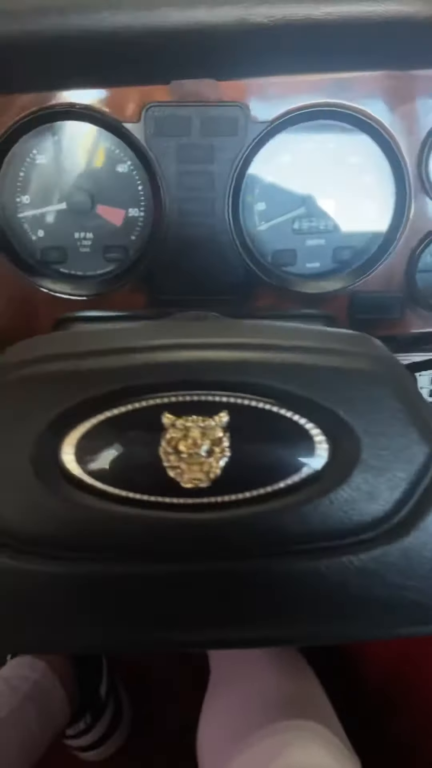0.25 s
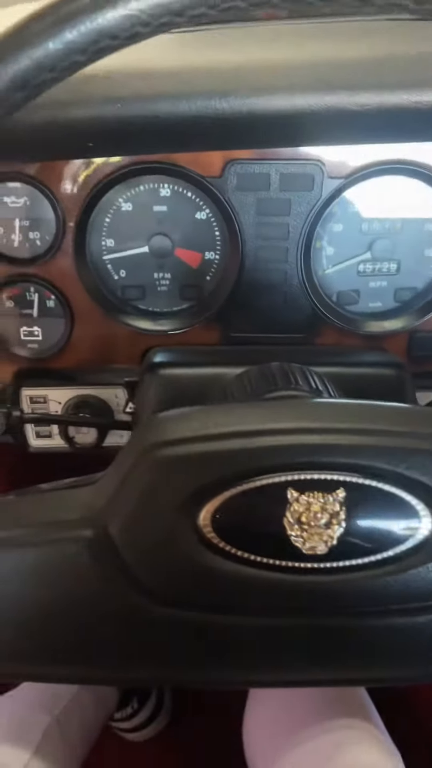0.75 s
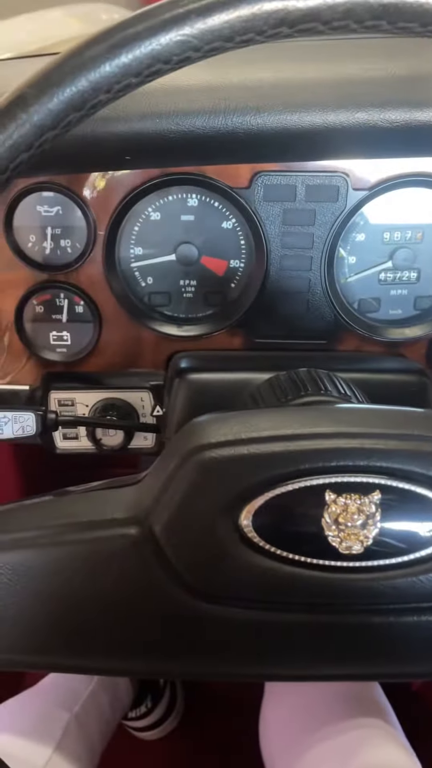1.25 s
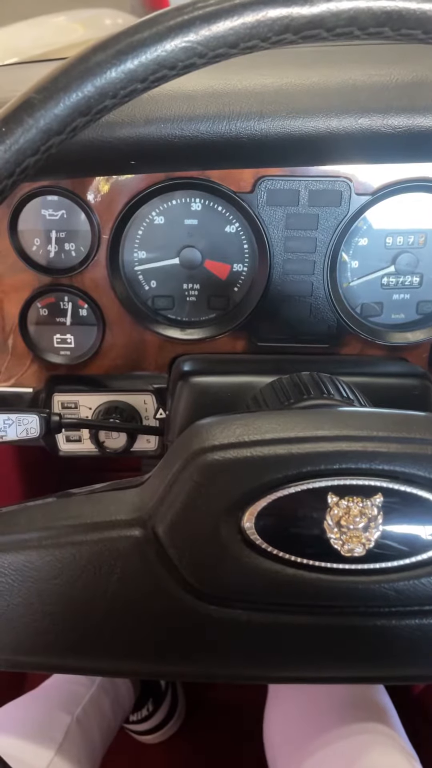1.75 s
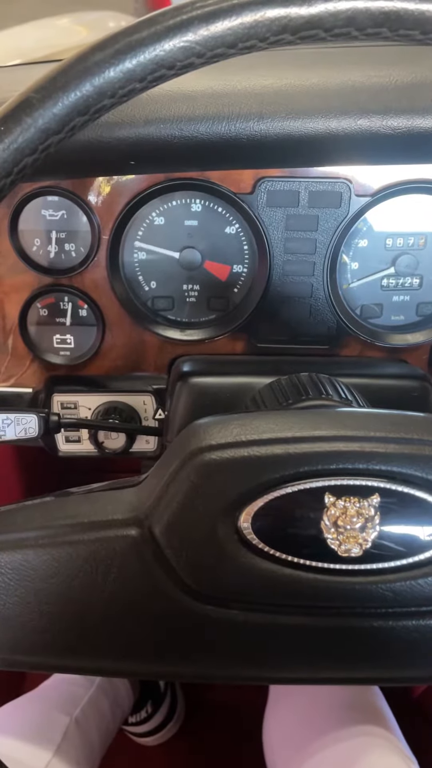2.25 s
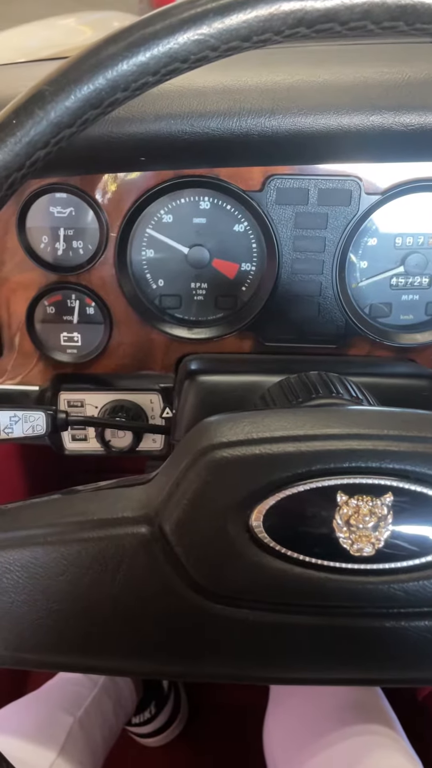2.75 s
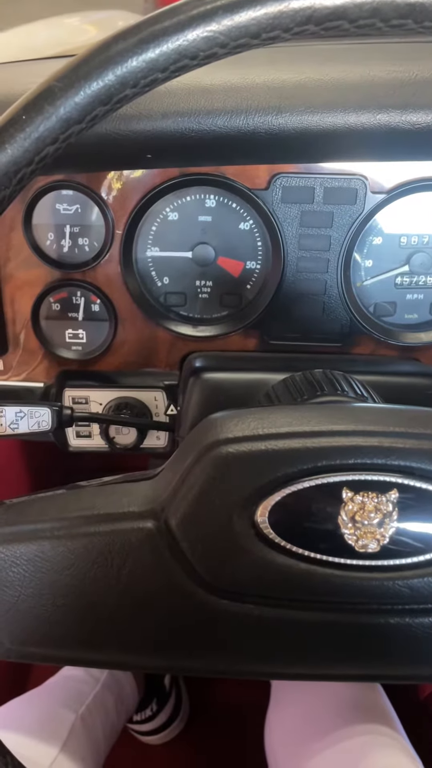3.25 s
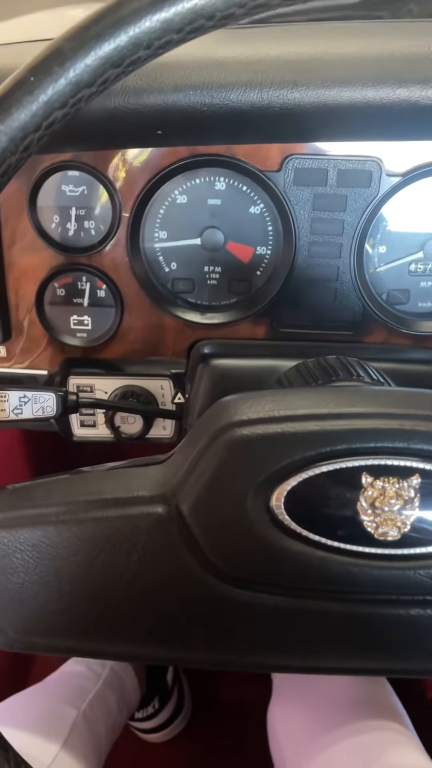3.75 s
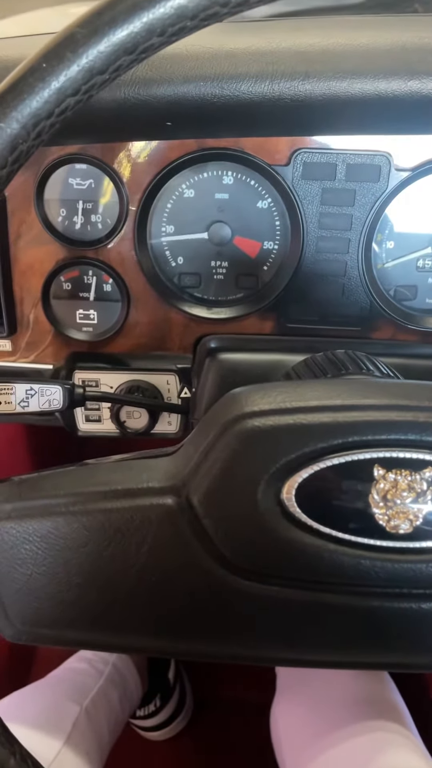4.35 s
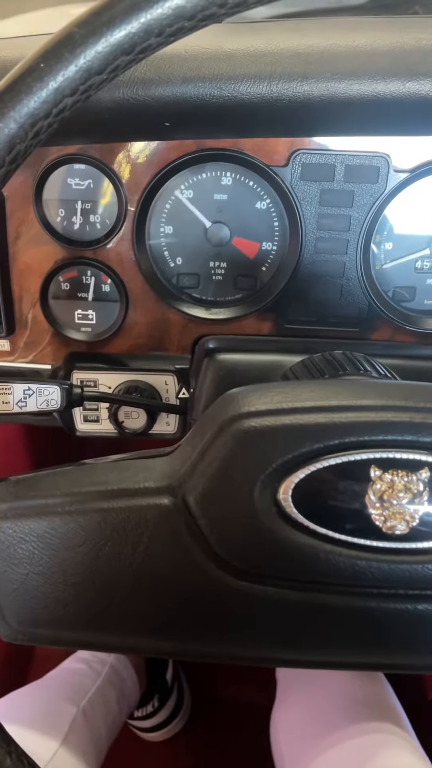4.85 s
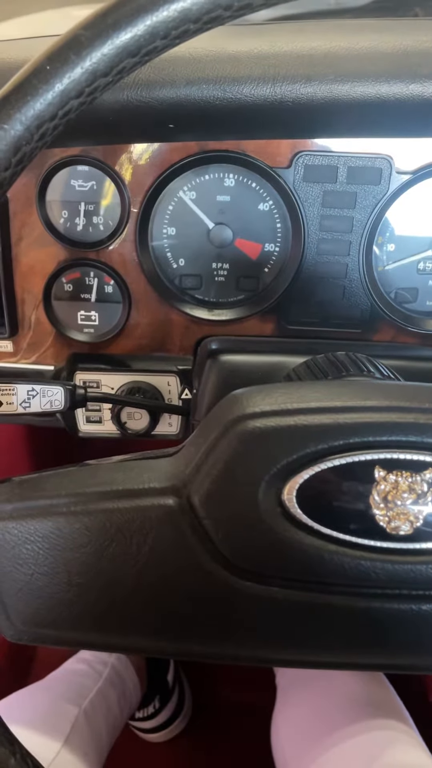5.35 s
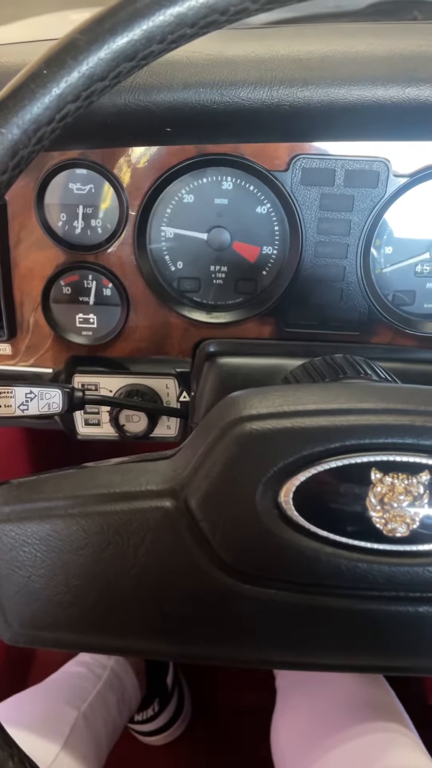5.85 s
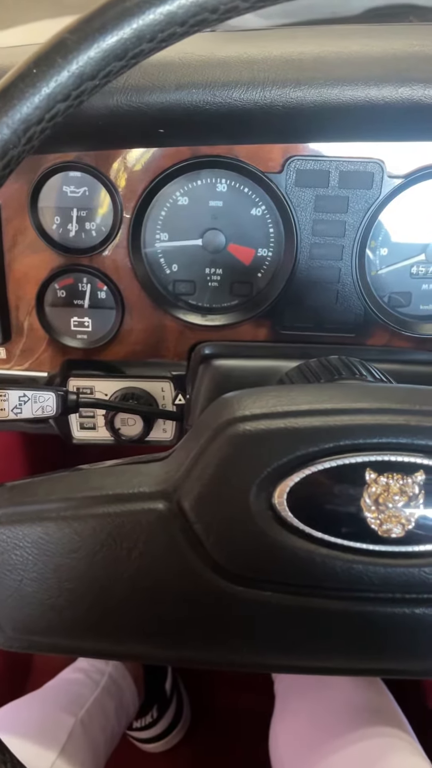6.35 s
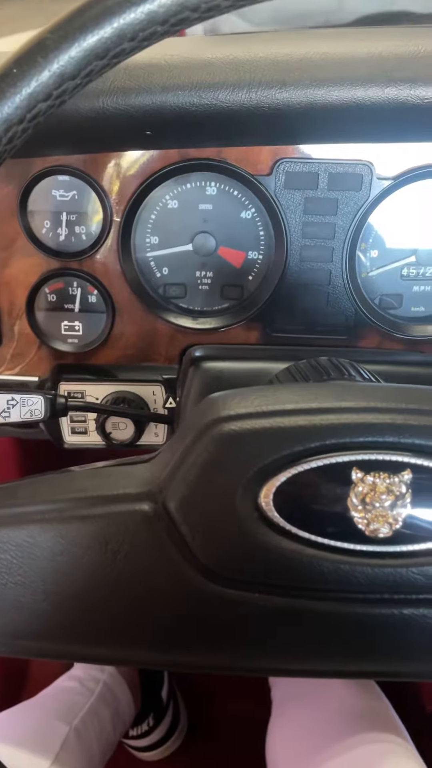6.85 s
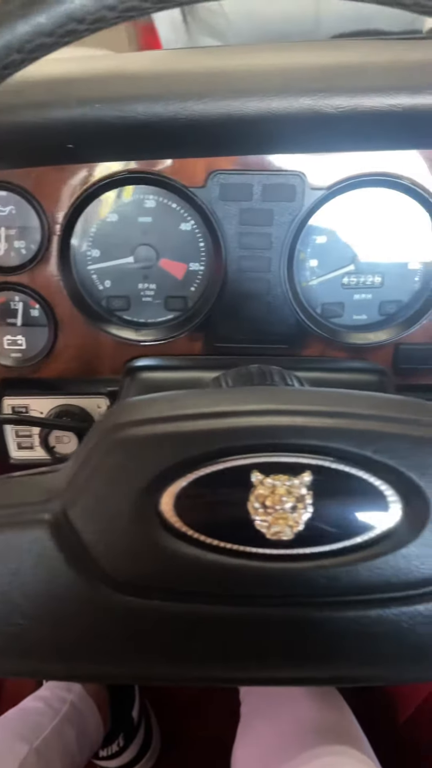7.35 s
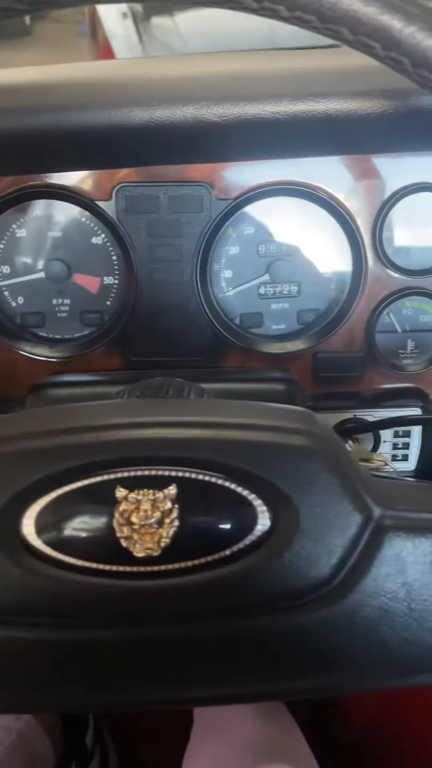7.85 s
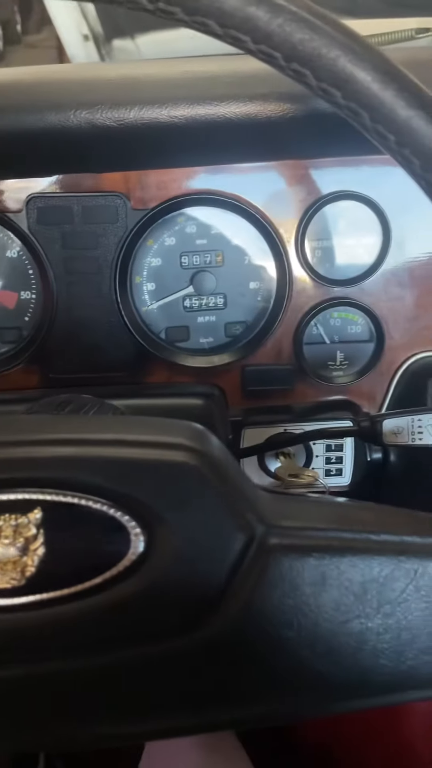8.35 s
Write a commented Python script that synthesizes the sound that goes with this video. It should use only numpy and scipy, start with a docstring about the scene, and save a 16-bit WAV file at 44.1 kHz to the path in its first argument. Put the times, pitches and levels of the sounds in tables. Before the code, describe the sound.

A warm, bassy straight-six idle heard from the driver's seat through a handheld stereo microphone. Two revs rise and fall: the first short, the second stronger and higher. Each brings cabin boom, vibrating panels, airy fan roar and bright intake hiss, then a coasting rumble with uneven burbles. As the revs bottom out a thin belt whine surfaces briefly, and the steady ticking idle resumes to the end.

```python
"""Straight-six blipped twice, from the driver's seat

The engine idles at about 750 rpm; the throttle is blipped twice. The firing orders boom as they sweep
through the cabin resonances, combustion noise and uneven firing pulses shake the panels, the cooling fan
rushes with speed, and intake hiss and rasp grow with the throttle. The coasting engine burbles and rumbles.
A handheld two-port microphone hears it all, with valve ticks, thin whines and drones behind."""
import sys
import numpy as np
from scipy import signal
from scipy.fft import rfft, irfft, next_fast_len
from scipy.io import wavfile

SR = 44100
rng = np.random.default_rng(int(sys.argv[2]) if len(sys.argv) > 2 else 0)


def output_pcm(signal):
    """Save a mono or channel-first signal as 16-bit PCM at the path in sys.argv[1].

    Samples are clipped to [-1, 1] before scaling.
    """
    pcm = np.clip(np.atleast_2d(signal).T, -1, 1) * 32767
    wavfile.write(sys.argv[1], SR, np.round(pcm).astype(np.int16))


N = 379701
T = np.arange(N) / SR   # s
SIZE = next_fast_len(N)
HZ = np.maximum(np.arange(SIZE // 2 + 1) * SR / SIZE, 1)   # the frequency of each spectrum bin
IDLE_HZ = 37   # firings per s, the reference for levels that follow speed

# Firing orders. Each row: multiple of the firing rate, then relative dB at idle, throttle open and coasting.
LOW_ORDERS = [(1, -2, 0, -5), (1 / 2, -22, -30, -14), (3 / 2, -29, -9.5, -13), (2, -9.5, -8, -11)]
# A gap between cabin modes: centre in Hz, width in Hz.
CABIN_VALLEY = (153, 40)
# Bulkhead resonances that colour the engine-bay noise.
# Each row: centre in Hz, width in Hz, mean height in dB over the broad noise.
BULKHEAD = [(782, 17, 5.5), (990, 45, 2.5), (1133, 32, 4.5), (1429, 13, 7.5), (1726, 19, 2.5),
            (1945, 45, 2), (2230, 59, 5.5), (2425, 37, 6.5), (2595, 14, 9), (3747, 21, 6), (5160, 77, 1),
            (6560, 280, 3)]


def from_db(db):
    """Gain of a level in dB."""
    return 10 ** (np.asarray(db) / 20)


def rms_one(x):
    """Scaled to rms 1."""
    return x / np.sqrt(np.mean(x ** 2) + 1e-20)


def at_hz(hz, values):
    """A table read on a log-frequency axis."""
    return np.interp(np.log(HZ), np.log(hz), values)


def in_time(rows):
    """Columns of a table joined by straight lines in time."""
    s, *columns = np.transpose(rows)
    return [np.interp(T, s, column) for column in columns]


def drift(rate):
    """Slow chance of spread 1: sparse noise through a double one-pole low-pass at rate Hz."""
    r = np.exp(-80 * np.pi * rate / SR)   # one draw every 40 samples
    noise = rng.standard_normal(N // 40 + 2002)
    slow = signal.lfilter([1], [1, -2 * r, r * r], noise)[2000:]
    return np.interp(np.arange(N) / 40, np.arange(len(slow)), rms_one(slow))


def resonance(x, hz, width):
    """Two-pole resonance, gain 1 on top."""
    r = np.exp(-np.pi * width / SR)
    zeros = np.array([1, 0, -1]) * (1 - r * r) / 2
    poles = [1, -2 * r * np.cos(2 * np.pi * hz / SR), r * r]
    return signal.lfilter(zeros, poles, x)


def field():
    """White noise on three paths: common to both ports, left only, right only."""
    return rng.standard_normal((3, N))


def coloured(spectrum):
    """A noise field with the given spectrum, rms 1."""
    hz, level_db = np.transpose(spectrum)
    shaped = rfft(field(), SIZE) * from_db(at_hz(hz, level_db))
    return rms_one(irfft(shaped, SIZE)[:, :N])


def engine_speed():
    """Firings per second, three to a turn of the crank."""
    # Each row: time in seconds, firings per second.
    speed_rows = [(0.0, 36.7), (0.4, 36.5), (0.9, 37.0), (1.45, 36.8), (1.65, 37.5), (1.82, 42.0),
                  (1.99, 50.6), (2.07, 56.2), (2.24, 71.2), (2.41, 79.4), (2.58, 74.8), (2.92, 58.1),
                  (3.09, 51.2), (3.6, 37.6), (3.7, 36.3), (3.95, 35.2), (4.02, 35.4), (4.1, 37.2),
                  (4.35, 47.1), (4.44, 54.0), (4.61, 73.2), (4.78, 87.2), (4.95, 94.8), (5.12, 97.0),
                  (5.46, 81.0), (5.8, 58.2), (5.97, 51.5), (6.14, 45.8), (6.39, 37.6), (6.6, 35.6),
                  (6.9, 35.0), (7.2, 36.5), (7.7, 37.7), (8.0, 36.7), (8.61, 36.6)]
    return in_time(speed_rows)[0]


def throttle():
    """Shares of time spent idling, open and coasting."""
    # Each row: pedal down, pedal up and idle running again, all in seconds.
    blips = [(1.685, 2.476, 3.75), (4.102, 5.203, 6.55)]
    opening_s, closing_s, catch_s = 0.12, 0.069, 0.2

    def ramp(start, length):
        return np.clip((T - start) / length, 0, 1)

    opened = sum(ramp(down, opening_s) * (1 - ramp(up, closing_s)) for down, up, _ in blips)
    coasting = sum(ramp(up, closing_s) * (1 - ramp(back, catch_s)) for _, up, back in blips)
    return 1 - opened - coasting, opened, coasting


def panel_lean():
    """Changes in dB of the three sharp panel modes as the handheld microphone shifts."""
    # Each row: time in seconds, then dB for the modes near 190 Hz, 325 Hz and 420 Hz.
    lean_rows = [(0, -2, 1, -4), (1.9, 2.5, -1.5, 6), (2.1, -2, 3, -8), (2.3, 1.5, -9, 2),
                 (2.5, 0, -3.5, 1.5), (2.8, -0.5, -3.5, 0.5), (3.4, -0.5, -3, 0.5), (4.2, -0.5, -1, 1.5),
                 (4.6, 0, -3, -0.5), (5.0, -2, 0.5, 0.5), (5.2, 3, 0.5, 2.5), (5.45, 1, 2.5, 0),
                 (5.65, 3.5, 1, -4.5), (5.85, 2, -1, 3.5), (6.3, -2, -4, -5), (7.0, 1, -1, 2),
                 (8.61, -4.5, -0.5, -3.5)]
    return in_time(lean_rows)


def burbles():
    """Uneven firing on the overrun: level changes in dB of the half order, other low orders and rumble."""
    # Each row: centre in seconds, length in seconds, dB on the half order, on the other low orders,
    # on the rumble.
    burble_rows = [(2.552, 0.083, 31, 12, 0), (2.738, 0.065, 32, 23, 16), (5.41, 0.14, 38, 21, 7),
                   (5.68, 0.2, -3, -9, 17)]
    return sum(np.outer(db, np.exp(-((T - s) / length) ** 2)) for s, length, *db in burble_rows)


def with_speed(speed, idle_db, slope_db, bend_db, lag_s):
    """A noise level that climbs with engine speed at once and lingers as the speed falls."""
    lingering = np.maximum(speed, np.interp(T - lag_s, T, speed))
    octaves = np.log2(lingering / IDLE_HZ)
    return idle_db + slope_db * octaves + bend_db * octaves ** 2


def roar_level(speed):
    """Combustion roar in dB; the panels drum harder as the revs tip over."""
    # Base law: dB at idle, dB per octave of speed, dB per octave squared, lingering in seconds.
    roar_law = (-38, 14.5, -3.5, 0.29)
    # Each row: start in seconds, end in seconds, rise in dB.
    drumming = [(2.57, 2.945, 2.3), (5.12, 5.743, 1.7)]
    edge_s = 0.18
    roar_db = with_speed(speed, *roar_law)
    for start, end, drum_db in drumming:
        corners = [start - edge_s, start, end, end + edge_s]
        roar_db += np.interp(T, corners, [0, drum_db, drum_db, 0])
    return roar_db


def order_levels(speed, states, swell_db):
    """Each low order's strength for the throttle state, times the boom at its present pitch."""
    # How exhaust and cabin pass a low tone. Each row: frequency in Hz, relative dB.
    boom = [(18, -55), (36, -26.5), (40, -23), (45.5, -13.5), (50.5, -13.5), (57, -41), (64, -31.5),
            (72, -20), (79, -32), (87, -22), (97, -26.5), (104, -24.5), (118, -19.5), (134, -40),
            (160, -41), (180, -35.5), (200, -1)]
    coasting_db_per_octave = -17   # the faster it coasts, the weaker the firings
    hz, boom_db = np.transpose(boom)
    fade_db = coasting_db_per_octave * states[2] * np.log2(speed / IDLE_HZ)
    levels = []
    for k, *db in LOW_ORDERS:
        passed_db = np.interp(np.log(k * speed), np.log(hz), boom_db)
        levels.append(np.dot(db, states) + fade_db + passed_db + swell_db[int(k >= 1)])
    return levels


def orders(phase, levels_db, wobble_db, slip):
    """Tones locked to the crank add up to one pressure dip per firing; uneven combustion makes them waver."""
    # Each row: multiple of the firing rate, mean level in dB rms before the cabin valley.
    upper_orders = [(2.28, -42), (2.5, -41), (3.0, -40), (3.501, -46.5), (4.001, -48.5)]
    lag_rad = 1.0   # whole orders above the first trail it: each dip falls slowly and recovers fast

    def tone(k, db):
        lag = lag_rad * (round(k, 1) in (2, 3, 4))
        turn = k * phase - lag + slip * (k - 1) * drift(5.6)
        return -from_db(db + wobble_db * k * drift(5.2)) * np.cos(turn)

    low = sum(tone(row[0], db) for row, db in zip(LOW_ORDERS, levels_db))
    upper = sum(tone(k, db) for k, db in upper_orders)
    return np.sqrt(2) * (low + upper - 0.8 * resonance(upper, *CABIN_VALLEY))


def panels(phase, roar_db, lean_db, revving, throb, pulse_db):
    """Combustion noise and firing pulses, unequal by cylinder and harder off idle, ring in the cabin."""
    # Cabin and panel resonances. Each row: centre in Hz, width in Hz, relative dB.
    panel_rows = [(46.5, 26, -1.5), (81, 44, -4.5), (108, 66, -3.5), (187.7, 31.4, 1.5), (224.4, 45, -8),
                  (321.8, 45, 0), (420, 29.3, -8), (537, 108, -11.5), (635, 103, -14.5)]
    # Row numbers of the three sharp modes, each with its column of lean_db.
    leaning = {3: 0, 5: 1, 6: 2}
    # Mean strength of each firing in the cycle, in relative dB.
    cylinders_db = [0, 1.5, -6.5, -11, 2.5, -7.5]
    growl_db, growl_cut_hz = -9.5, 129   # extra firing pulses off idle, high-passed
    firing = np.floor(phase / (2 * np.pi)).astype(int)
    count = firing[-1] + 1
    strength = from_db(1.7 * rng.standard_normal(count) + np.resize(cylinders_db, count))
    pulses = rms_one(np.diff(firing, prepend=0) * strength[firing])
    high_pass = signal.butter(4, growl_cut_hz, "high", fs=SR, output="sos")
    growl = from_db(growl_db) * revving * signal.sosfilt(high_pass, pulses)
    noise = field() * (1 + throb * np.cos(phase))
    knocks = noise + (from_db(pulse_db) * pulses + growl) * [[1], [0.01], [.4]]   # common, left, right
    rings = 0
    for k, (hz, width, db) in enumerate(panel_rows):
        mode_db = db + (lean_db[leaning[k]] if k in leaning else 0)
        ring = rms_one(resonance(resonance(knocks, hz, 2.5 * width), hz, width))
        rings = rings + (-1) ** k * from_db(mode_db) * ring   # neighbours in opposite polarity
    return from_db(roar_db) * rms_one(rings - 0.5 * resonance(rings, *CABIN_VALLEY))


def fan(speed):
    """Cooling-fan rush: broad noise whose level follows engine speed."""
    # Each row: frequency in Hz, relative dB per Hz.
    fan_spectrum = [(260, -55), (450, 0.5), (720, -7.5), (950, -3.5), (1260, -10), (1900, -8.5),
                    (2600, -16.5), (2750, -16.5), (3300, -15.5), (4800, -21), (6600, -27), (7400, -27.5),
                    (9600, -76), (16300, -100)]
    # Before the trim: dB at idle, dB per octave of speed, dB per octave squared, lingering in seconds.
    rush_law = (-44.5, 16.5, -2.5, 0.0753)
    trim_db = -3
    return from_db(with_speed(speed, *rush_law) + trim_db) * coloured(fan_spectrum)


def block_noise(phase):
    """Steady mechanical noise of the block, pulsing slightly with the firings."""
    # Each row: frequency in Hz, relative dB per Hz.
    block_spectrum = [(260, -52), (450, -41), (483, -52), (530, -9), (694, -15), (780, -29), (847, -11),
                      (1200, -9), (1650, -9.5), (2640, -13), (2930, -12.5), (5720, -15.5), (7400, -21),
                      (9620, -62), (16300, -120)]
    return from_db(-49) * (1 + 0.03 * np.cos(phase)) * coloured(block_spectrum)


def bulkhead_peaks(rush, block):
    """What the bulkhead resonances add to the engine-bay noise; each peak swells and sinks."""
    block_share, wander_db = .6, .9   # the block noise is coloured more weakly
    source = rush + block_share * block
    return sum((from_db(db + wander_db * drift(0.6)) - 1) * resonance(source, hz, width)
               for hz, width, db in BULKHEAD)


def drones():
    """Wavering tones, perhaps a blower or pump; the higher one fades away as time goes on."""
    # Each row: frequency in Hz, mean peak dB at first, mean peak dB at last.
    drone_rows = [(413.7, -52.5, -73), (312, -51.5, -49.5)]
    total = 0
    for hz, first_db, last_db in drone_rows:
        level_db = first_db + (last_db - first_db) * T / T[-1] + 2.2 * drift(0.67)
        total = total + from_db(level_db) * np.sin(2 * np.pi * hz * T + 1.4 * drift(1.42))
    return total


def gear_tones(phase, idling):
    """Thin gear or belt tones at idle, locked to the crank but wavering."""
    # Each row: multiple of the firing rate, mean peak dB at idle.
    gear_rows = [(35.8, -68), (45.7, -68), (53.6, -67), (57.3, -67), (59.5, -68), (64.3, -68), (68.7, -68),
                 (76.6, -71)]
    return idling * sum(from_db(db + 3 * drift(7)) * np.sin(k * phase + 1.5 * drift(8))
                        for k, db in gear_rows)


def valve_ticks(phase):
    """Uneven light valve-gear taps, two to a firing, that ring in the bulkhead resonances."""
    level_db, spread_db = -61.5, 6
    seats = np.diff(np.floor(phase / np.pi + .15 * drift(30.0)), prepend=0) > 0
    strength = from_db(spread_db * rng.standard_normal((3, N)))
    taps = rms_one(seats * strength * rng.choice([-1, 1], (3, N)))
    return from_db(level_db) * rms_one(sum(resonance(taps, hz, 40.0) for hz, *_ in BULKHEAD[1:10]))


def intake(phase, open_db, throb, flutter_db):
    """Air hiss pulsing with the intake strokes; air past the throttle plate whistles only above some flow."""
    # Each row: time in seconds, mean hiss level in dB.
    hiss_rows = [(0.0, -52), (1.6, -52), (1.82, -46.5), (2.04, -45), (2.4, -43), (2.47, -49), (3.07, -56.5),
                 (3.75, -58.5), (3.9, -53.5), (4.12, -52.5), (4.19, -46), (4.5, -41.5), (4.87, -42.5),
                 (6.14, -59.5), (6.64, -57), (6.8, -55.5), (7.7, -53), (8.61, -55.5)]
    # Each row: frequency in Hz, relative dB per Hz.
    intake_spectrum = [(2500, -30), (5000, -8), (7200, -3.5), (8500, 0), (10300, 0), (11600, -1),
                       (12300, -7), (13500, -10), (15000, -10), (15300, -14), (15800, -14)]
    # Whistle: centre in Hz, width in Hz, dB over the hiss at full flow.
    whistle_row = (11640, 200, -11)
    hiss_db = in_time(hiss_rows)[0] + 0.96 * drift(13.0)
    hz, width, over_db = whistle_row
    whistle = from_db(3.2 * drift(11.0)) * rms_one(resonance(resonance(field(), hz, 2 * width), hz, width))
    flow = np.clip((hiss_db - open_db) / 15.0, 0, 1)
    air = coloured(intake_spectrum) + from_db(over_db) * flow * whistle
    return from_db(hiss_db + flutter_db * drift(27.0)) * (1 + throb * np.cos(phase)) * air


def alternator():
    """A thin belt-driven whine whose neighbouring lines flutter; it reaches the ports out of step."""
    # It trails the engine speed. Each row: time in seconds, frequency in Hz, relative level in dB.
    whine_rows = [(0, 1172, -56), (0.9, 1180, -56), (1.7, 1176, -55), (1.9, 1400, -68), (3.5, 1230, -66),
                  (3.66, 1180, -54), (3.76, 1147, -53), (3.92, 1137, -48), (4.01, 1118, -51),
                  (4.13, 1138, -51), (4.25, 1200, -64), (6.35, 1200, -66), (6.48, 1155, -56),
                  (6.6, 1134, -51), (6.85, 1134, -48), (7.02, 1117, -54), (7.15, 1143, -53),
                  (7.3, 1155, -58), (7.5, 1180, -62), (8.61, 1172, -60)]
    # The line and its neighbours. Each row: Hz off the line, relative dB.
    sides = [(-33, -10), (0, 0), (33, -3)]
    hz, level_db = in_time(whine_rows)

    def turn(off):
        return 2 * np.pi * np.cumsum(hz + off) / SR + .5 * drift(8.0)

    whine = sum(from_db(db + 4.5 * drift(9.0)) * np.sin(turn(off)) for off, db in sides)
    octave_above = .3 * np.sin(2 * turn(0))
    return from_db(level_db) * (whine + octave_above) * [[1], [.9], [-.5]]   # common, left, right


def induction(phase, speed, opened):
    """Rasp under load in uneven bursts, one to an intake stroke; air-box resonances come in patches."""
    # Each row: frequency in Hz, relative dB per Hz.
    rasp_spectrum = [(500, -15), (800, -13), (1150, 1.5), (1600, -4.5), (2500, -6), (3800, -9),
                     (6500, -11.5), (8000, -60)]
    # Air-box resonances. Each row: centre in Hz, width in Hz, mean dB over the rasp.
    air_box = [(1140, 140, 4.3), (2150, 390, 3.2), (2500, 180, 3)]
    idle_db, db_per_octave = -49, 4   # before the bursts: at idle speed; rise with speed
    grain_db, throb = 1.5, 0.13   # spread of stroke strengths; pulsing with the firings
    gain = opened * from_db(idle_db + db_per_octave * np.log2(speed / IDLE_HZ))
    firing = phase / (2 * np.pi)
    count = int(firing[-1]) + 2
    strokes = np.interp(firing, np.arange(count), rng.standard_normal(count))
    rasp = gain * from_db(grain_db * strokes) * (1 + throb * np.cos(phase)) * coloured(rasp_spectrum)
    return rasp + sum((from_db(db + 2.9 * drift(7.0)) - 1) * resonance(rasp, hz, width)
                      for hz, width, db in air_box)


def singing(phase, speed, roar_db, lean_db):
    """Off idle, whole and half orders set the sharp panel modes singing as they pass."""
    # Each row: centre in Hz, width in Hz, mean dB against the roar.
    modes = [(199.2, 18.7, -11), (335, 23, -6), (429.7, 20, -10)]
    from_hz, full_hz = 44, 68   # firing rates at which the singing starts and is full
    gain = np.interp(speed, [from_hz, full_hz], [0, 1]) * from_db(roar_db)
    comb = 0
    for k in np.arange(4, 17) / 2:
        turn = k * phase + rng.uniform(0, 2 * np.pi) + 0.32 * k * drift(5.0)
        comb = comb + from_db(3.3 * drift(9.0)) * np.cos(turn)
    return sum(from_db(db + lean) * resonance(resonance(gain * comb, hz, 2 * width), hz, width)
               for (hz, width, db), lean in zip(modes, lean_db))


def overrun_rumble(coasting, swell_db):
    """Exhaust rumble while coasting: low resonant noise that swells with the burbles."""
    # Centre in Hz, width in Hz, level in dB before the swells.
    rumble = (34, 61, -45.5)
    hz, width, level_db = rumble
    noise = rms_one(resonance(resonance(rng.standard_normal(N), hz, width), hz, width))
    return from_db(level_db + swell_db) * coasting * noise


def patchy(x, depth_db, rate):
    """Turbulence: every band of two thirds of an octave swells and sinks by itself."""
    spectrum = rfft(x, SIZE)
    place = np.clip(1.5 * np.log2(HZ / 500), 0, 7)   # band number from 500 Hz up
    bands = [np.clip(1 - abs(place - k), 0, 1) for k in range(8)]
    return sum(from_db(depth_db * drift(rate)) * irfft(spectrum * band, SIZE)[:, :N] for band in bands)


def ports(paths):
    """Each port hears the common path, lagged and shaded by the handset, plus a diffuse path of its own."""
    # Each row: frequency in Hz, share of sound common to both ports 0-1, lag between them in radians,
    # left minus right in dB.
    port_rows = [(60, .975, 0.0, 0.6), (160, .96, 0.0, 2.0), (330, .5, 0.6, -1.7), (700, .3, -1.4, 0.5),
                 (1200, .4, 0.2, 0.2), (2000, .3, 0.9, 1.0), (3500, .55, -0.2, 4.5), (5200, .55, -0.6, 4.5),
                 (7200, .65, 1.7, 0), (7700, .999, 3.14, 0), (8800, .999, 3.14, 0), (9100, .75, 4.0, 0),
                 (10200, .75, 5.4, 0), (10600, .999, 6.28, 0), (12700, .99, 6.28, 0), (13200, .5, 8.4, 0),
                 (13800, .999, 9.42, 0)]
    bass_cut_hz = 25
    hz, alike, lag, lean_db = np.transpose(port_rows)
    alike = np.clip(at_hz(hz, alike), 0, 1)
    side = np.array([[1], [-1]]) / 2
    common, *own = rfft(paths, SIZE) / np.sqrt(1 + (bass_cut_hz / HZ) ** 4)
    shared = np.sqrt(alike) * common * np.exp(-1j * side * at_hz(hz, lag))
    heard = shared + np.sqrt(1 - alike) * np.array(own)
    return irfft(heard * from_db(side * at_hz(hz, lean_db)), SIZE)[:, :N]


def scene():
    """All engine sounds on three paths, most of them locked to one firing phase, heard at two ports."""
    speed, states = engine_speed(), np.array(throttle())
    idling, opened, coasting = states
    phase = 2 * np.pi * np.cumsum(speed) / SR
    roar_db, lean_db, swell_db = roar_level(speed), panel_lean(), burbles()
    rush = fan(speed) + induction(phase, speed, opened)
    block = block_noise(phase)
    air = rush + block + bulkhead_peaks(rush, block)
    air += drones() + gear_tones(phase, idling) + valve_ticks(phase)
    air += intake(phase, open_db=-50, throb=.08, flutter_db=.5)
    paths = panels(phase, roar_db, lean_db, 1 - idling, throb=0.044, pulse_db=-19.0)
    paths += patchy(air, depth_db=0.93, rate=23.0) + alternator()
    paths[0] += orders(phase, order_levels(speed, states, swell_db), wobble_db=.7, slip=.14)
    paths += singing(phase, speed, roar_db, lean_db) * [[1], [.6], [.2]]   # common, left, right
    paths[0] += overrun_rumble(coasting, swell_db[-1])
    return ports(paths)


def record(dry):
    """The microphone's top is cut steeply above 15.7 kHz."""
    low_pass = signal.ellip(12, .5, 70, 15700, fs=SR, output="sos")
    return signal.sosfilt(low_pass, dry)


dry = scene()
out = record(dry)
output_pcm(out)
```